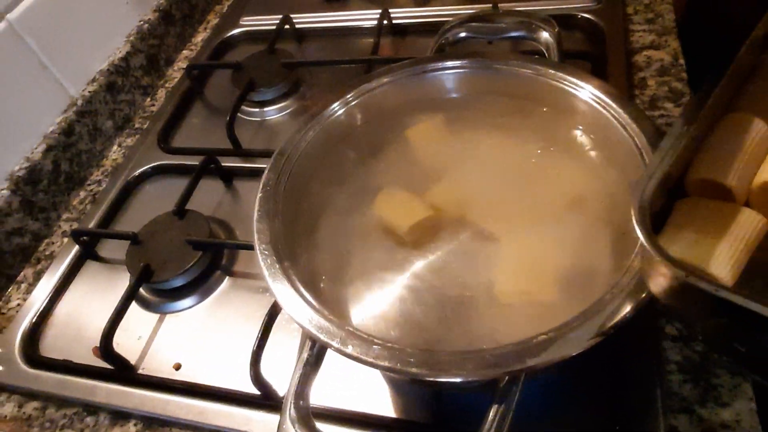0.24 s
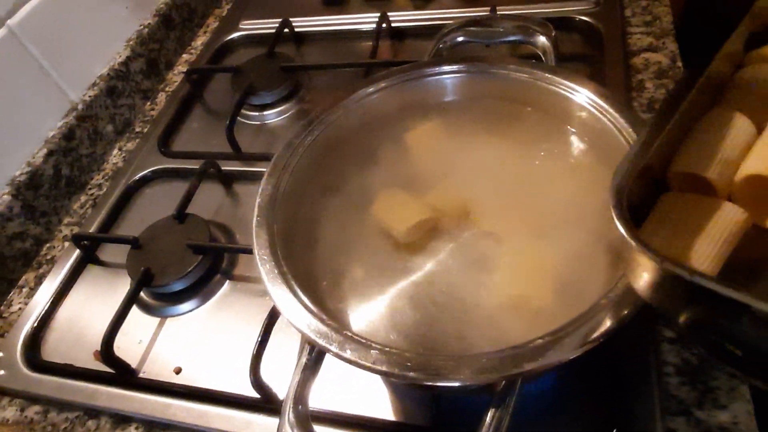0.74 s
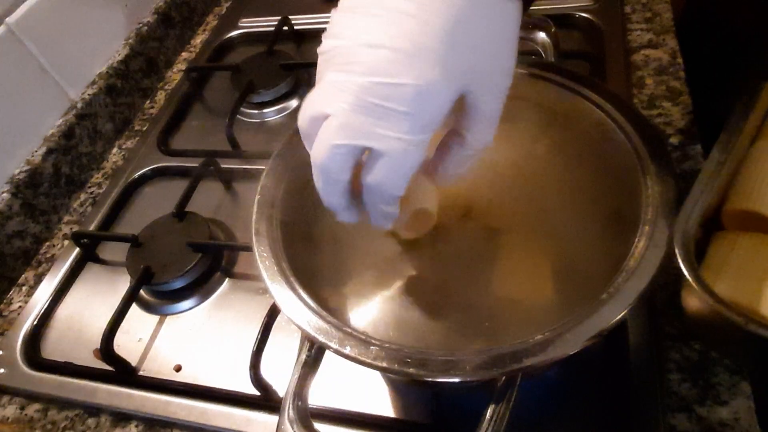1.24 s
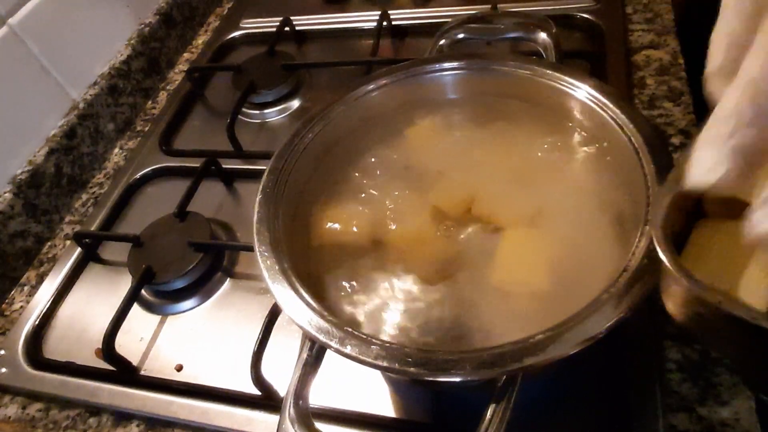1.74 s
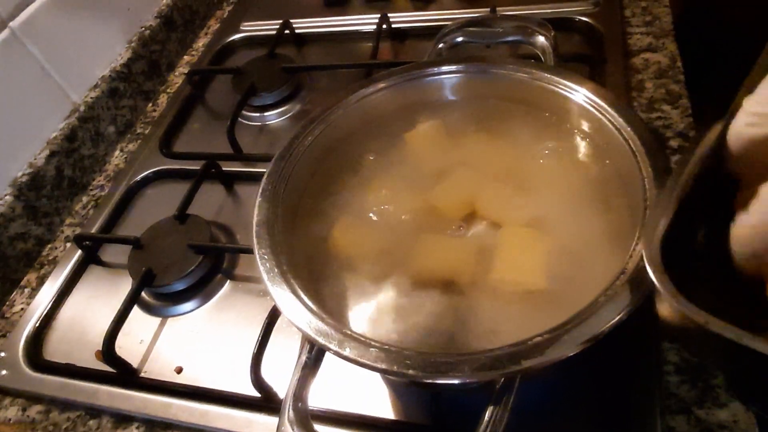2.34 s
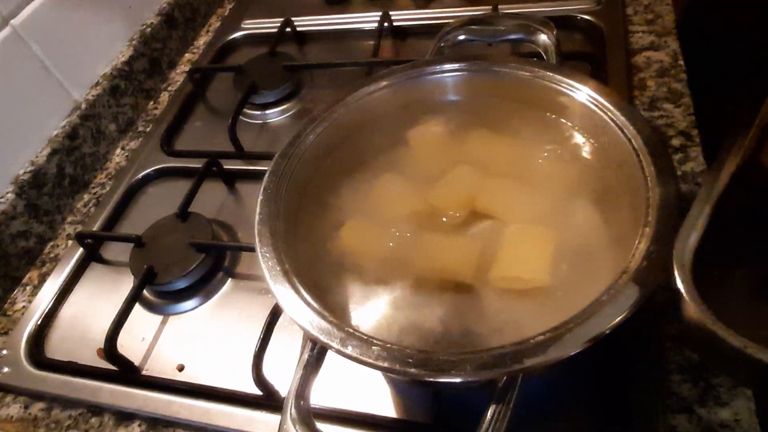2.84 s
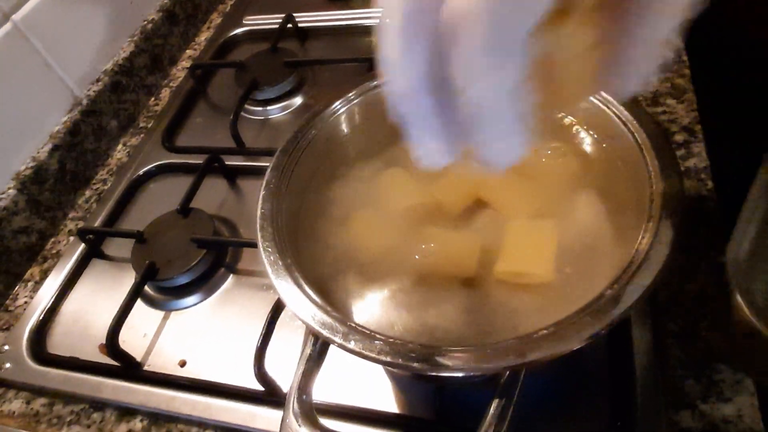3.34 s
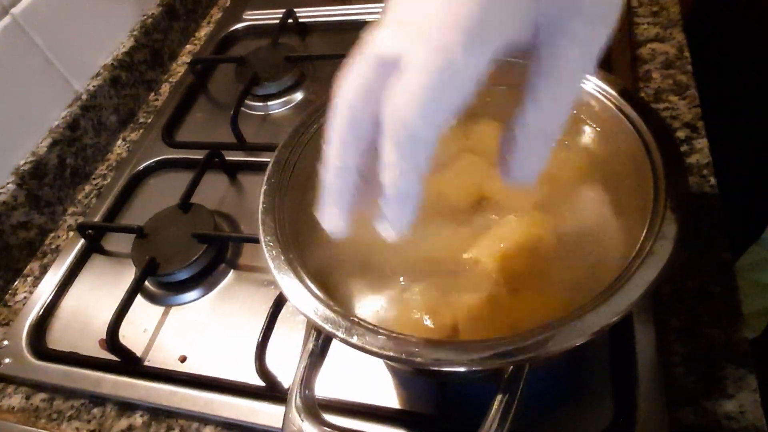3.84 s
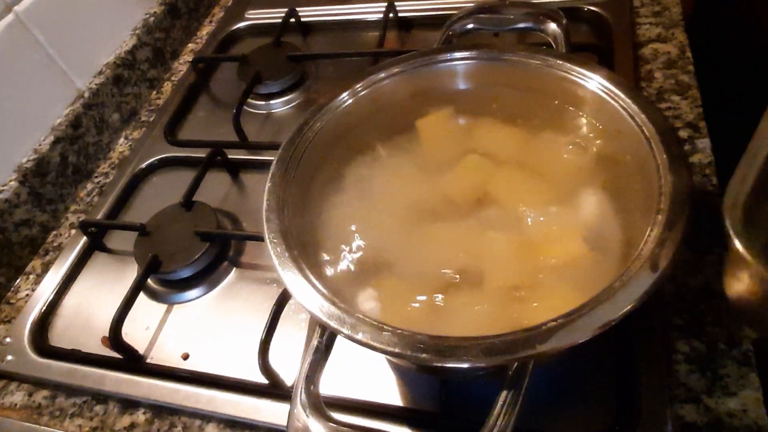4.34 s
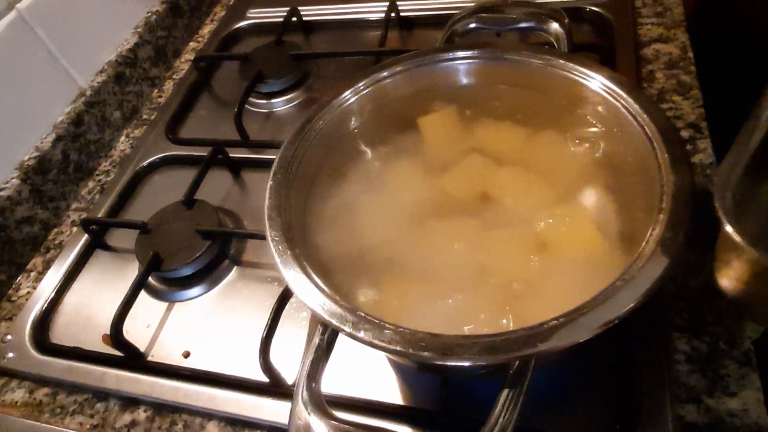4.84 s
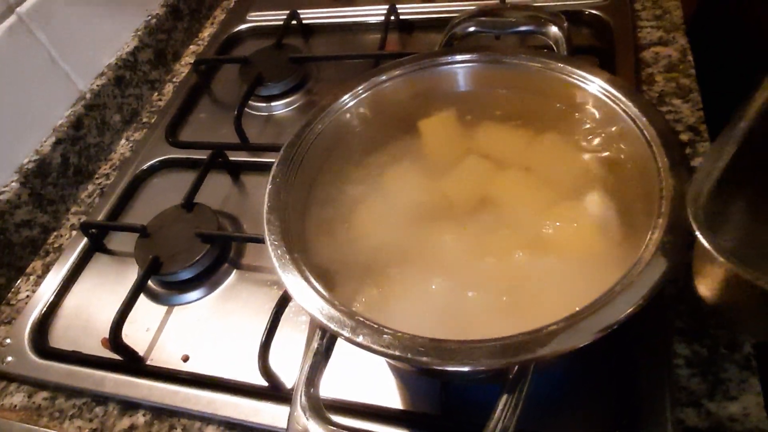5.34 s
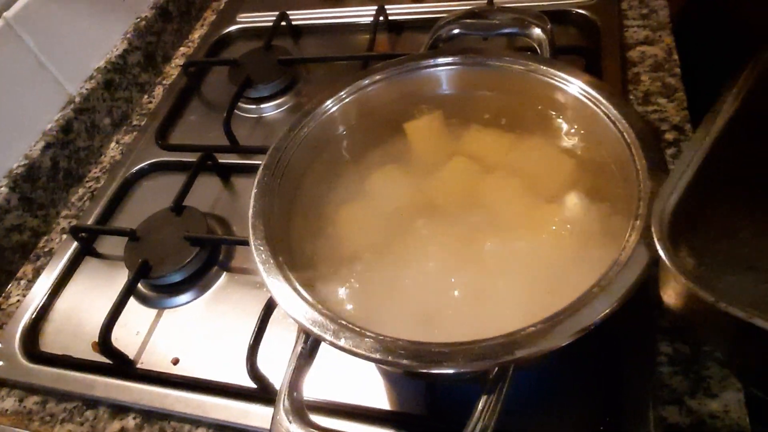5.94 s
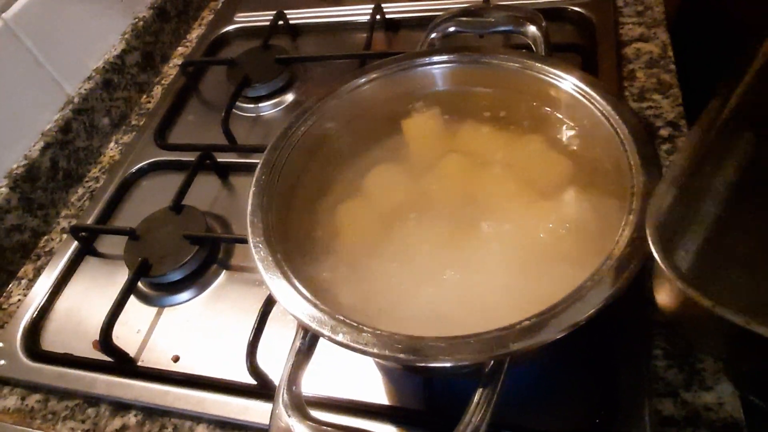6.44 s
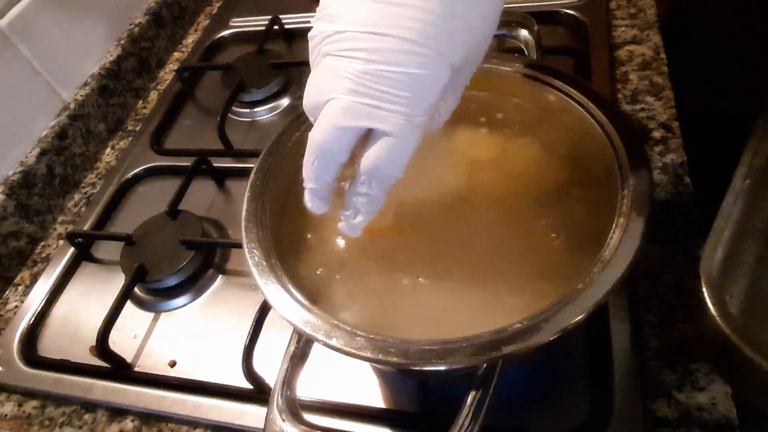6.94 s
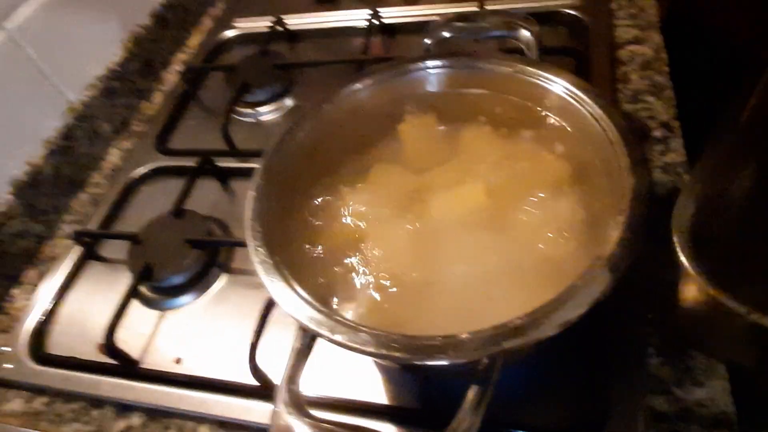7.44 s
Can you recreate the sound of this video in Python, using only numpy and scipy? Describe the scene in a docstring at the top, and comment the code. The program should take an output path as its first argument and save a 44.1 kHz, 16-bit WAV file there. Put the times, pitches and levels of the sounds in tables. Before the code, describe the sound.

Close stereo kitchen sound: bright, brittle clatter of dry pasta against a steel tray to the right, then a small light splash in the pot. More rummaging and a sharp knock lead to a second, splashier drop with fizzing. A longer bout of clattering and scraping follows, then a strong, round plop with churning bubbles and the strongest hiss. A quiet burner rush and low hum continue underneath, with a short room tail.

```python
"""A gas burner rushes softly over a low hum, a pot simmers, and dry pasta tubes scrape and knock in a steel tray.
Small tiled kitchen, two microphones: tray well to the right, pot slightly right, a short reverberant tail.
A gloved hand rummages in the tray and drops three handfuls into the pot: shaped noise makes the knocks, clinks
and scrapes, short rising sines the slaps and plops, and grainy noise the fizz that flares after each drop."""
import sys
import numpy as np
from scipy import signal
from scipy.fft import rfft, irfft, next_fast_len
from scipy.io import wavfile
from scipy.ndimage import uniform_filter1d, map_coordinates

SR = 44100
rng = np.random.default_rng(int(sys.argv[2]) if len(sys.argv) > 2 else 0)


def inscribe(sig):
    """Save sig as 16-bit PCM at rate SR to the path in sys.argv[1].

    A 1-D sig is mono; a 2-D sig holds one channel per row.
    Samples are clipped to [-1, 1] before scaling.
    """
    pcm = np.round(np.clip(np.atleast_2d(sig).T, -1, 1) * 32767)
    wavfile.write(sys.argv[1], SR, pcm.astype(np.int16))


N = 338996
TIME = np.arange(N) / SR  # s
AGE = TIME[:SR // 4]  # s since the start of a short sound
TOP_HZ = 16200  # upper band limit

# All levels are relative: filters, placement and trims follow. Colour curves are dB per Hz.
# burner colour: hz, level_db
BURNER_COLOUR = [(20, -46), (32, -36), (50, -8), (85, -7), (125, -9), (220, -15), (450, -20), (950, -20.5),
                 (1500, -21), (2400, -37), (5000, -35.5), (7800, -54), (9500, -80), (16000, -77)]
# burner likeness between left and right microphones: hz, correlation (-1 to 1)
BURNER_LIKENESS = [(60, 0.98), (130, 0.89), (290, 0.81), (640, 0.59), (1410, 0.31), (3100, -0.3),
                   (6820, -0.23), (15000, -0.089)]
# hum tones: pitch_hz, level_db (rms)
HUM_TONES = [(96.9, -51), (183.0, -61)]
# fizz colour: hz, level_db
FOAM_COLOUR = [(300, -28), (1000, -2), (2500, -1), (5000, -3), (8000, -3), (9000, -11.5), (11500, -1)]
# a handful sinks: start_s, small_bubbles_db (peak), pitch_hz, settle_s, wait_s until it foams, fizz_db
SUNK_HANDFULS = [(1.378, -45, 1850, .025, .43, -54), (3.788, -38, 1550, .1, .14, -46.5),
                 (7.021, -32, 1600, .05, .01, -42)]
# the hand pushes tubes across the tray: start_s, length_s, scrape_db
TRAY_STROKES = [(0, .03, -36.5), (.14, .03, -37.5), (.29, .04, -39), (.385, .015, -41), (.455, .025, -36),
                (2.03, .04, -33), (2.165, .1, -27.5), (2.385, .12, -36), (2.605, .06, -27),
                (2.71, .07, -39), (2.82, .08, -33.5), (4.5, .17, -45), (4.755, .21, -30.5),
                (5.19, .16, -38), (5.46, .19, -31.5), (5.73, .15, -40.5), (6.0, .05, -42), (7.66, .03, -38)]
# loose tubes keep shifting while the hand is in the tray: start_s, length_s, scrape_db
TRAY_REACHES = [(0, .55, -52), (2.0, 1.07, -51), (4.72, 1.33, -45)]
# broad colour of the tray: hz, level_db
TRAY_COLOUR = [(60, -32), (150, -15.5), (350, -8.5), (600, -1), (1000, 1.5), (1500, -2.5), (2500, -10),
               (3500, -11), (5000, -18.5), (8000, -21.5), (9300, -30), (11500, -23.5)]
# resonances of the steel tray: pitch_hz, width_hz, level_db
STEEL_RESONANCES = [(591, 67, -6.5), (1050, 18, -24.5), (1413, 39, -23), (2102, 80, -4), (2413, 44, -3),
                    (3890, 210, -6.5), (4400, 440, -19), (4900, 160, -17.5), (5190, 140, -22),
                    (6490, 120, -35), (8120, 190, -31)]
# tubes tumbling against the tray: start_s, level_db (peak), hardness_db (below 0 dull, above 0 sharp),
# decay_s (nominal 60 dB clatter)
TRAY_KNOCKS = [(0.055, -24, -7, .095), (0.1114, -9, 1, .05), (0.1505, -19, -5, .099),
               (0.192, -15.5, -1, .04), (0.2485, -17.5, -7, .04), (0.3238, -21.5, -3, .082),
               (0.4457, -25, -11, .097), (0.4549, -15, -1, .077), (0.4715, -12, 2, .037),
               (0.539, -31, 5, .05), (2.0179, -14.5, -3, .12), (2.083, -17.5, 5, .07),
               (2.2346, -19, -2, .13), (2.4632, -19, -1, .06), (2.6132, -8.5, 3, .11),
               (2.6375, -8.5, -1, .046), (2.6495, -8.5, 6, .075), (2.7539, -2, 1, .03),
               (2.9471, -16, -6, .06), (2.955, -13.5, 3, .044), (3.068, -34, -4, .06),
               (3.128, -35, -6, .06), (4.4769, -23, 2, .05), (4.568, -24, -6, .1), (4.5813, -19, 5, .07),
               (4.6072, -16.5, -8, .053), (4.6543, -27, -8, .037), (4.7107, -25, -5, .06),
               (4.806, -15.5, 0, .13), (4.8338, -7, -2, .075), (4.8933, -13.5, 1, .09),
               (4.9302, -12, 5, .044), (4.9598, -14, 1, .031), (4.9945, -7.5, 1, .044),
               (5.034, -17, -3, .1), (5.0648, -19, -1, .05), (5.3763, -11.5, -7, .08),
               (5.3837, -8, 3, .042), (5.5196, -15.5, 9, .06), (5.5409, -17, 3, .044),
               (5.6239, -9.5, 0, .091), (5.6516, -19, 11, .035), (5.7587, -20.5, -7, .081),
               (5.9244, -20.5, -1, .06), (5.9527, -8, -5, .03), (5.989, -4, 3, .042),
               (6.1496, -15, 0, .031), (7.67, -22, 4, .06)]
# landing of one tube dropped on end, columns as for the knocks
LANDING = (5.2032, -7, 6, .07)
# a single tube struck cleanly: start_s, level_db (peak)
TUBE_CLINKS = [(0.5076, -7.7), (2.110, -26.5)]
# resonances of a hard tube: pitch_hz, width_hz, level_db
TUBE_RESONANCES = [(2470, 500, -0.5), (3150, 700, -2), (3960, 350, -9), (1550, 300, -21.5)]
# faint squeaks: centre_s, level_db, pitch_hz, half_length_s (to 1/e)
FAINT_SQUEAKS = [(1.328, -51, 2600, .008), (2.035, -31, 2450, .014), (2.114, -22, 2450, .006),
                 (2.64, -22, 2480, .02), (6.955, -50, 3050, .018), (7.485, -49.5, 2080, .045),
                 (7.61, -55, 4650, .014), (7.655, -46, 4000, .02)]
# tubes slapping the water: start_s, level_db (peak), pitch_hz (at onset), spray_db (beside the slap)
WATER_SLAPS = [(1.3735, -19.5, 1850, -26), (1.41, -24.5, 1520, -27), (1.54, -41, 3800, -14),
               (1.685, -28, 2240, -15), (1.792, -37, 2000, -12), (3.63, -30.5, 2690, -19),
               (3.759, -23.5, 2170, -22), (3.771, -22, 1990, -12), (3.789, -19, 2770, 0),
               (3.817, -25, 2100, -22), (3.869, -20, 1500, -9), (3.921, -22.5, 3140, -14),
               (3.929, -28, 3000, 9), (6.832, -29.5, 2560, -7), (7.025, -21, 1530, -0.5),
               (7.181, -34, 1680, -12)]
# trapped air ringing as a bubble: start_s, level_db (peak), pitch_hz (at onset)
AIR_PLOPS = [(1.541, -30.5, 880), (1.791, -27.5, 800), (1.951, -32.5, 720), (3.761, -31, 900),
             (3.851, -28, 861), (3.871, -20.5, 880), (4.016, -39, 1300), (4.217, -42, 488),
             (6.994, -35, 1100), (7.01, -4, 1496), (7.07, -24.5, 900), (7.091, -20, 1420),
             (7.129, -12.5, 866), (7.18, -29, 610)]
# tubes rub softly in the closed glove: start_s, length_s, rustle_db
GLOVE_RUSTLES = [(1.42, .38, -61.5), (2.405, .18, -46), (3.62, .27, -56), (4.44, .26, -54), (6.9, .07, -54),
                 (7.57, .12, -56)]
# glove rustle colour: hz, level_db
GLOVE_COLOUR = [(300, -25), (1200, -6), (3000, 2), (5000, -2), (8000, -3), (9300, -10), (12000, -5)]
# kitchen reverberation: hz, t60_s
KITCHEN_T60 = [(200, 0.98), (600, 0.43), (1500, 0.41), (4000, 0.28), (12000, 0.067)]

FOAM_RISE_S, FOAM_T60_S = .02, 1.0  # the foam flares up and collapses
LINGER_DB, LINGER_T60_S = -13.5, 7.5  # a weaker fizz stays on the fresh pasta
IDLE_FIZZ_DB = -63.3  # the simmering pot alone
SWELL_DB_PER_S, REST_DB_PER_S = 330, 290  # any sliding sets in and comes to rest at these rates
THUD_DB, CRACK_DB = -15, -17  # parts of a knock at hardness 0
CRACK_GROWS = 0.6  # dB of crack per dB of hardness
FLIGHT_S, FLIGHT_SHRINK = 0.0395, 0.8  # first flight, each next flight over the last
REBOUND_DB, BOUNCE_LOSS_DB = -17, 1.5  # first rebound, loss a bounce
RIM_HARDNESS_DB, RIM_T60_S = 17, .034  # contact on the tube's rim, nominal decay
# bubble life in cycles: a slap, a gentle plop, extra for a plop at full strength
SLAP_CYCLES, PLOP_CYCLES, PLUNGE_CYCLES = 3.7, 3.0, 10


def amp(db):
    """Decibels to gain."""
    return 10 ** (np.asarray(db) / 20)


def unit(x):
    """Scaled to rms 1."""
    return x / np.sqrt(np.mean(x ** 2) + 1e-20)


def along(points, hz):
    """(Hz, value) points interpolated on a log axis."""
    f, v = np.transpose(points)
    return np.interp(np.log(hz + 1), np.log(f + 1), v)


def fade(t, t60):
    """Exponential decay by 60 dB in t60 seconds."""
    return np.exp(-np.log(1000) * t / t60)


def wobble(rate):
    """A smooth random curve, rate knots a second."""
    return map_coordinates(rng.standard_normal(int(N * rate / SR) + 4), [TIME * rate])


def add(track, s, sound):
    """Mixes a sound into a track at time s."""
    part = track[..., max(round(s * SR), 0):][..., :sound.shape[-1]]
    part += sound[..., :part.shape[-1]]


def filtered(x, response):
    """x times a complex response of frequency."""
    m = next_fast_len(N + SR // 2, True)
    return irfft(rfft(x, m) * response(np.fft.rfftfreq(m, 1 / SR)), m)[..., :N]


def coloured(x, gain, size=8192):
    """A causal minimum-phase filter shaped by the gain curve; white noise keeps its level."""
    g = gain(np.fft.rfftfreq(size, 1 / SR))
    cepstrum = irfft(np.log(np.maximum(unit(g), 1e-6)))
    # folding the cepstrum forward makes the filter causal
    cepstrum[1:size // 2] *= 2
    cepstrum[size // 2 + 1:] = 0
    impulse = irfft(np.exp(rfft(cepstrum)))
    return signal.oaconvolve(x, impulse[None], axes=1)[:, :N]


def pair(size, scatter):
    """Noise at two microphones: a shared part and a scattered part of their own."""
    z = rng.standard_normal((3, size))
    return (z[0] + scatter * z[1:]) / np.hypot(1, scatter)


def stove(burner_db=-52, hum_db=-1):
    """The flame's soft rush, wide in the treble, and a slightly unsteady low hum."""
    def turn(hz):
        return np.arccos(np.clip(along(BURNER_LIKENESS, hz), -1, 1)) / 2

    def mid_side(hz):
        return amp(along(BURNER_COLOUR, hz)) * [np.cos(turn(hz)), np.sin(turn(hz))]

    def tone(hz):
        drift = 1.1 * wobble(12)
        return amp(1.3 * wobble(14)) * np.sqrt(2) * np.sin(2 * np.pi * hz * TIME + drift)

    mid, side = filtered(rng.standard_normal((2, N)), mid_side)
    flame = amp(burner_db + .5 * wobble(11)) * unit(np.array([mid + side, mid - side]))
    return flame + sum(amp(db + hum_db) * tone(hz) for hz, db in HUM_TONES)


def bubble(hz, cycles, rise, attack=0.00023):
    """A bubble rings, rises in pitch and is cut short as it opens at the surface."""
    t = AGE[:SR // 20]
    u = t * hz / max(cycles, .5)  # age in bubble lives
    ring = np.sin(2 * np.pi * hz * t * (1 + rise * np.minimum(u, 2)))
    return (1 - np.exp(-t / attack)) * np.exp(-u * u) * ring


def simmer(simmer_db=-61, pitch_hz=850, count=1100):
    """Small soft bubbles keep breaking in the pot, up to an octave either side of pitch_hz."""
    out = np.zeros((2, N))
    for when, size, pitch in rng.random((count, 3)):
        pop = bubble(pitch_hz * 2 ** (2 * pitch - 1), cycles=5, rise=.06)
        add(out, when * N / SR, amp(simmer_db + 6 * size) * pop)
    return out


def foaming():
    """Strength of the fizz: it flares after each handful, collapses and lingers over the idle simmer."""
    power = np.full(N, amp(IDLE_FIZZ_DB) ** 2)
    collapse = fade(TIME, FOAM_T60_S) + amp(LINGER_DB) * fade(TIME, LINGER_T60_S)
    flare = (1 - np.exp(-TIME / FOAM_RISE_S)) * collapse
    for s, *_, wait, db in SUNK_HANDFULS:
        add(power, s + wait, (amp(db) * flare) ** 2)
    return np.sqrt(power)


def fizz(grain_db=2.0):
    """Tiny steam bubbles bursting on the fresh pasta, as grainy noise with an unsteady level."""
    bursts = unit(amp(grain_db * wobble(900)) * pair(N, scatter=1.8))
    return foaming() * amp(0.88 * wobble(23)) * coloured(bursts, lambda hz: amp(along(FOAM_COLOUR, hz)))


def tray(hz, ring_db=3):
    """The tray's broad colour with its steel resonances standing out."""
    peaks = sum(amp(db / 2) / (1 + (2 * (hz - f) / width) ** 2) for f, width, db in STEEL_RESONANCES)
    return amp(along(TRAY_COLOUR, hz)) * (1 + amp(ring_db) * peaks)


def patchy(x, patchy_db, size=256):
    """Touching tubes stress changing pitches: random smooth patches over time and frequency."""
    z = signal.stft(x, nperseg=size)[2]
    field = uniform_filter1d(rng.standard_normal(z.shape[1:]), size=4, axis=0)
    field = uniform_filter1d(field, size=7, axis=1)
    return signal.istft(z * unit(amp(patchy_db * unit(field))), nperseg=size)[1][:, :N]


def sliding(moves):
    """Strength of rubbing: each move swells in, holds for its length, then dies away."""
    power = np.zeros(N)
    for s, length, db in moves:
        before = SWELL_DB_PER_S * np.maximum(s - TIME, 0)
        after = REST_DB_PER_S * np.maximum(TIME - s - length, 0)
        power += amp(db - before - after) ** 2
    return np.sqrt(power)


def scraping(scrape_db=1, slip_t60=0.028, spread_db=4.0, rub=0.6, tilt_db=-0.08):
    """Ridged tubes catch and slip over each other in many small rasps."""
    # about 220 slips a second over a steady rub
    slips = (rng.random(N) < 220 / SR) * amp(spread_db * np.clip(rng.standard_normal(N), -2, 2))
    power = np.abs(signal.oaconvolve(slips ** 2, fade(AGE, slip_t60) ** 2)[:N])
    noise = np.sqrt(power / power.mean() + rub) * pair(N, scatter=0.71)
    rasp = unit(patchy(noise, patchy_db=3.5))
    colour = lambda hz: tray(hz) * amp(tilt_db * np.log2(hz + 1))  # sliding is duller than striking
    return amp(scrape_db) * coloured(rasp * sliding(TRAY_STROKES + TRAY_REACHES), colour)


def bounces(count=4):
    """A tube's landing and rebounds on its rim: flights shorten and the rebounds weaken in turn."""
    times = LANDING[0] + np.cumsum(FLIGHT_S * FLIGHT_SHRINK ** np.arange(count))
    rebounds = [(s, REBOUND_DB - BOUNCE_LOSS_DB * k, RIM_HARDNESS_DB, RIM_T60_S) for k, s in enumerate(times)]
    return [LANDING] + rebounds


def knocks(body_db=-7, low_hz=900, high_hz=4300, spiky_db=3, attack=0.0002):
    """Each knock is a quick flurry of contacts: low thud, longer-lasting body and bright crack."""
    thud, body, crack = np.zeros((3, 2, N))
    size = len(AGE)
    first_blow = (1 - np.exp(-AGE / attack)) * (1 + .3 * fade(AGE, .012))
    for s, db, hardness_db, t60 in TRAY_KNOCKS + bounces():
        # contact strength holds for 16 samples at a time
        contacts = amp(spiky_db * np.repeat(rng.uniform(-2, 2, size), 16)[:size])
        flurry = amp(db) * unit(contacts) * first_blow
        thud_gain = amp(THUD_DB - hardness_db)
        crack_gain = amp(CRACK_DB + CRACK_GROWS * hardness_db)
        add(thud, s, thud_gain * flurry * fade(AGE, 1.23 * t60) * pair(size, scatter=0.069))
        add(body, s, amp(body_db) * flurry * fade(AGE, 1.47 * t60) * pair(size, scatter=0.48))
        add(crack, s, crack_gain * flurry * fade(AGE, 1.28 * t60) * pair(size, scatter=0.934))
    body = patchy(body, patchy_db=2.5)
    below = lambda hz, edge: 1 / (1 + (hz / edge) ** 8)
    return (coloured(thud, lambda hz: tray(hz) * below(hz, low_hz))
            + coloured(body, lambda hz: tray(hz) * (below(hz, high_hz) - below(hz, low_hz)))
            + coloured(crack, lambda hz: tray(hz, ring_db=16) * (1 - below(hz, high_hz))))


def clinks(clink_db=0, attack=0.0014, life=0.0052, tail_db=-24, tick_db=-27):
    """A hard tube chatters for a few milliseconds in its own resonances, then rattles to rest."""
    contact = np.zeros((2, N))
    settle = fade(AGE, .11)
    for s, db in TUBE_CLINKS:
        shape = (1 - np.exp(-AGE / attack)) * (np.exp(-(AGE / life) ** 2) + amp(tail_db) * settle)
        add(contact, s, amp(db + clink_db) * shape * pair(len(AGE), scatter=.4))

    def tube(hz):
        peaks = sum(amp(db) / (1 + (2 * (hz - f) / width) ** 2) for f, width, db in TUBE_RESONANCES)
        return amp(tick_db) + peaks

    return coloured(contact, tube)


def squeaks(rough=0.47):
    """Thin squeaks that swell and fade: sines with unsteady pitch and rough level."""
    out = np.zeros(N)
    for s, db, hz, half in FAINT_SQUEAKS:
        phase = 2 * np.pi * np.cumsum(hz * (1 + .025 * wobble(400))) / SR
        swell = np.exp(-((TIME - s) / half) ** 2)
        out += amp(db) * swell * unit(1 + rough * wobble(220)) * np.sin(phase)
    return out


def splashes(plop_db=1, slap_db=0, spray_db=-9, smack_db=-18.5, droplet_db=-11, count=6):
    """Tubes slap the surface, throw spray and droplets, and gulp air that rings as bubbles."""
    water, spray, smack = np.zeros((3, 2, N))
    for s, db, hz, high_db in WATER_SLAPS:
        add(water, s, amp(db + slap_db) * bubble(hz, SLAP_CYCLES, rise=.05, attack=.0003))
        add(spray, s, amp(db + high_db + spray_db) * fade(AGE, 0.04) * pair(len(AGE), scatter=0.57))
        for delay, pitch in rng.random((count, 2)):
            droplet = bubble(hz * 2 ** (1.1 * pitch - .5), cycles=4, rise=.01)
            add(water, s + .012 * delay, amp(db + droplet_db) * droplet)
    for s, db, hz in AIR_PLOPS:
        # a harder plunge traps air that stays under for longer
        cycles = PLOP_CYCLES + PLUNGE_CYCLES * amp(db)
        add(water, s, amp(db + plop_db) * bubble(hz, cycles, rise=0.011, attack=0.0012))
        add(smack, s, amp(db + smack_db) * fade(AGE, 0.064) * pair(len(AGE), scatter=0.65))
    spray_colour = [(500, -22), (3000, -13), (5000, -15), (9000, -13.5), (15000, -23)]
    smack_colour = [(40, -60), (150, -6), (400, -17.5), (1400, -10.5), (3500, -11.5), (6000, -30), (15000, -41)]
    spray = coloured(spray, lambda hz: amp(along(spray_colour, hz)))
    smack = coloured(smack, lambda hz: amp(along(smack_colour, hz)))
    return water + spray + smack


def churning(churn_db=0, sinking=0.26, count=72):
    """Broken bubbles crowd behind each plunge; later ones tend to be lower and weaker."""
    out = np.zeros((2, N))
    for s, db, pitch_hz, settle, _, _ in SUNK_HANDFULS:
        lateness = rng.exponential(size=count)
        for late, (size, pitch) in zip(lateness, rng.standard_normal((count, 2))):
            hz = pitch_hz * np.exp(.25 * pitch - sinking * min(late, 2))
            level_db = db + churn_db + 2.7 * size - 2.2 * late
            add(out, s + late * settle, amp(level_db) * bubble(hz, cycles=3, rise=0.07))
    return out


def glove(grain_db=2.5):
    """A fine, bright rustle of dry tubes held in the hand, as grainy noise."""
    grains = unit(amp(grain_db * wobble(300)) * pair(N, scatter=1.2))
    return coloured(grains * sliding(GLOVE_RUSTLES), lambda hz: amp(along(GLOVE_COLOUR, hz)))


def placed(x, right_db, lag_ms):
    """The right microphone hears it louder and earlier."""
    sides = np.array([[-.5], [.5]])
    shift = lambda hz: np.exp(2j * np.pi * hz * sides * lag_ms / 1000)
    return amp(sides * right_db) * filtered(x, shift)


def kitchen(x, build=0.0013):
    """Tiled walls answer with a short diffuse tail whose decay depends on frequency."""
    hz, t, z = signal.stft(rng.standard_normal((2, SR * 2 // 3)), SR, nperseg=256)
    tail = signal.istft(z * fade(t, along(KITCHEN_T60, hz)[:, None]), SR, nperseg=256)[1]
    tail *= 1 - np.exp(-(TIME[:tail.shape[1]] / build) ** 2)
    return signal.fftconvolve(x, tail / np.linalg.norm(tail[0]), axes=1)[:, :N]


def scene():
    """Tray to the right, pot slightly right, both in the room; stove and fizz go in directly."""
    stove_sound = stove()
    rattle = knocks() + scraping()
    clink = clinks()
    pot = splashes() + churning() + simmer() + squeaks() + glove()
    direct = placed(rattle + clink, right_db=9, lag_ms=.41) + placed(pot, right_db=3.0, lag_ms=0.044)
    tray_room = amp([[-1.5], [1.5]]) * kitchen(amp(-14) * rattle + amp(-22) * clink)
    pot_room = kitchen(amp(-17) * pot)
    return direct + tray_room + pot_room + fizz() + stove_sound


def record(dry):
    """The loudest peaks are rounded off and nothing is kept above the band limit."""
    rounded = dry / (1 + np.abs(dry / .92) ** 6) ** (1 / 6)
    return filtered(rounded, lambda hz: hz < TOP_HZ)


dry = scene()
out = record(dry)
inscribe(out)
```